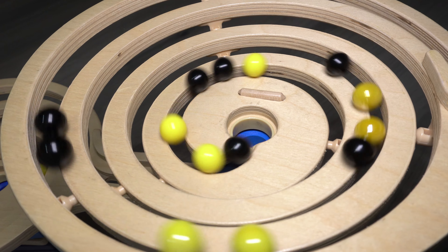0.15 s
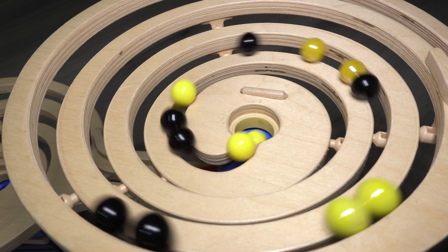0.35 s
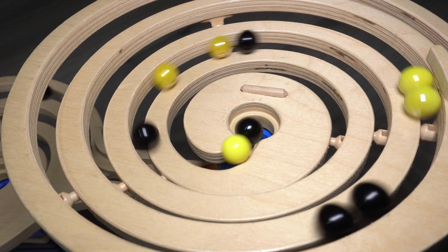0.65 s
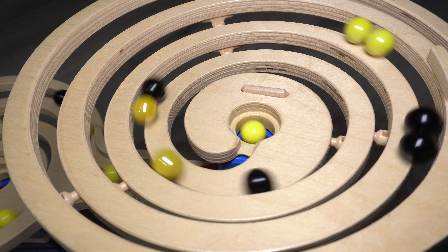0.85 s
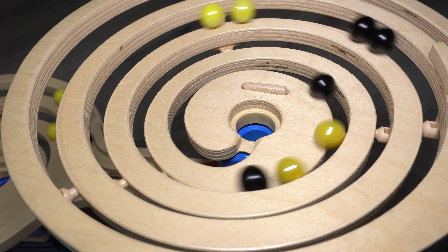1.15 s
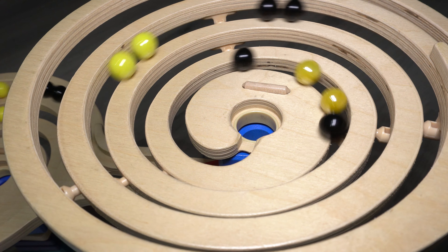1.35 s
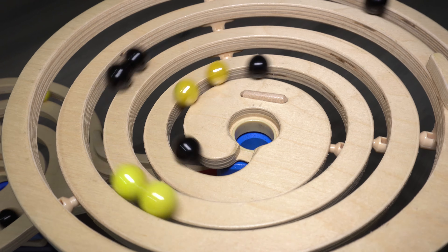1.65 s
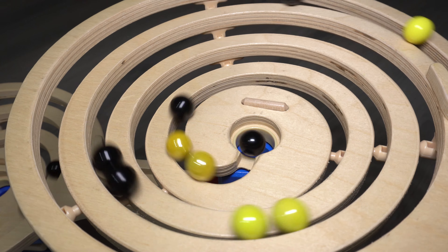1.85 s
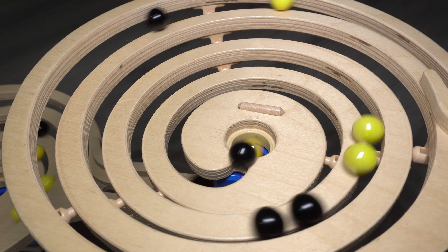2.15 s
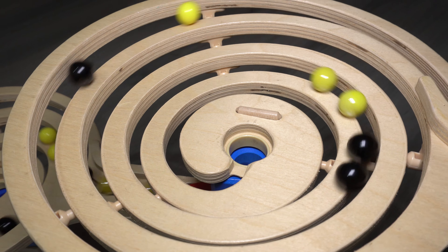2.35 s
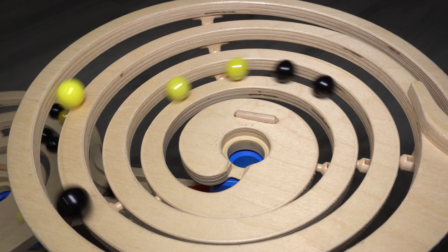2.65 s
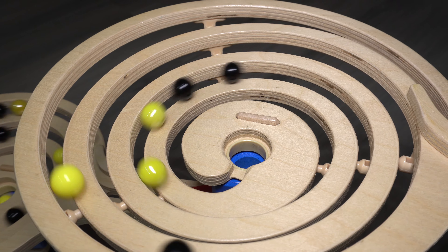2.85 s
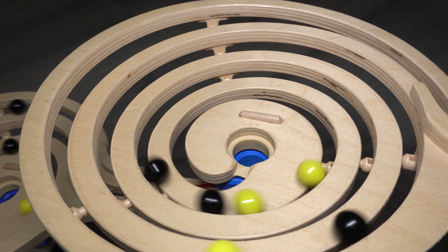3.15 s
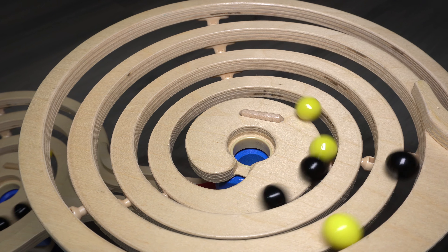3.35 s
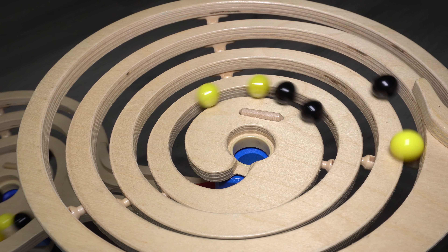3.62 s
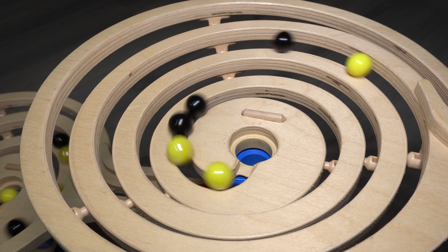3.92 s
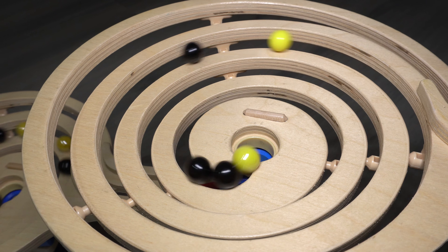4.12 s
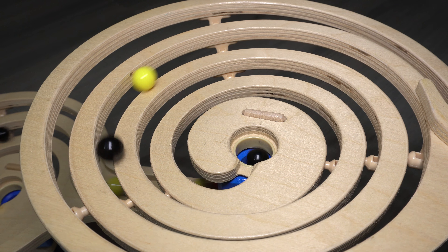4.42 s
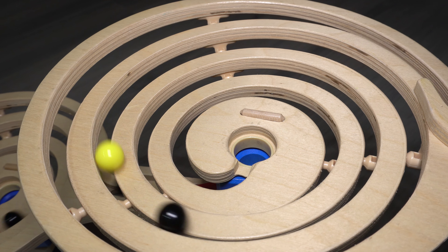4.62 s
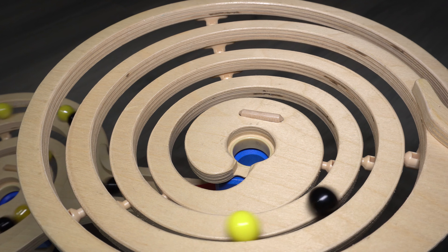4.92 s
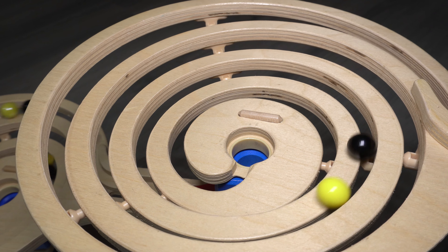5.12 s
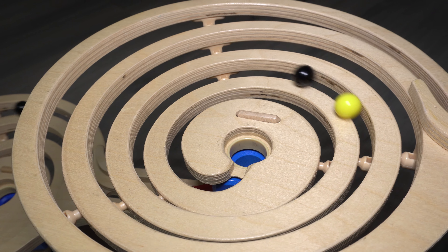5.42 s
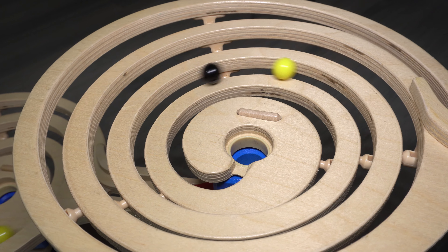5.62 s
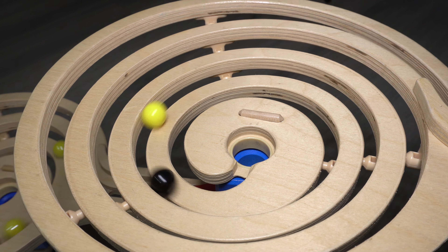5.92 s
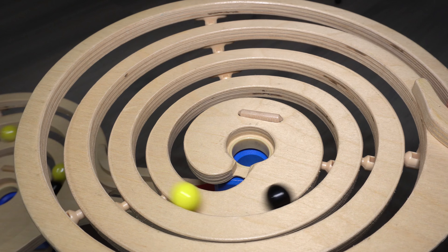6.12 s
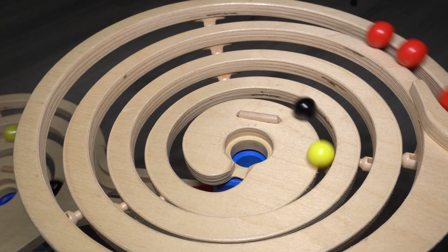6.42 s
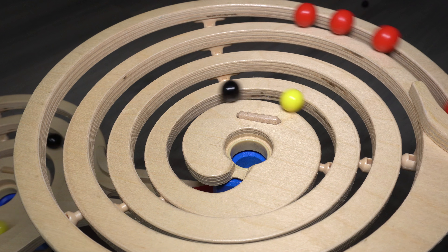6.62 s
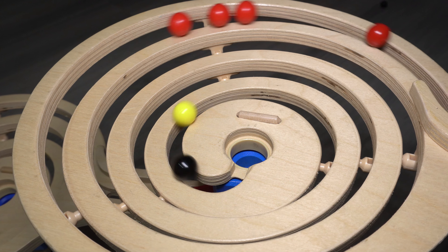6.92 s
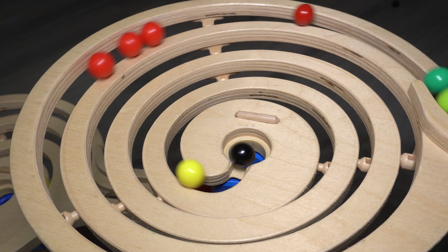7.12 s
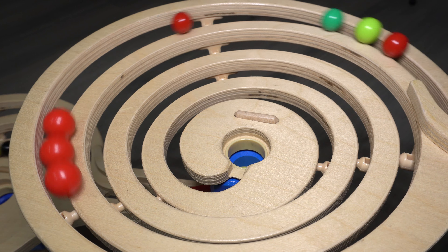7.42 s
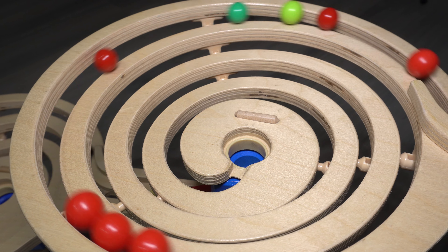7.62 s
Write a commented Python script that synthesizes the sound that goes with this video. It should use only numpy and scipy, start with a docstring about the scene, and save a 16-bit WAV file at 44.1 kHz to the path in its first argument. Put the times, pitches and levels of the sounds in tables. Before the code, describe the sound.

Close up, glass marbles drum and hiss down a plywood track in surges, with sharp clicks, pings and occasional knocks.

```python
"""In a small room, glass marbles run down a wooden spiral track on a table, close to the microphone.
Rolling is a stream of tiny bumps that drums on the plywood and hisses where glass meets wood; it thins
as the spiral empties and surges when a group picks up speed. Marbles rattle in bouts, tick against the
groove, ping and clack together, then knock, chink and thud further down. A low room rumble lies under it."""
import sys
import numpy as np
from scipy import signal
from scipy.fft import rfft, irfft
from scipy.io import wavfile
from scipy.ndimage import uniform_filter1d

SR = 44100
rng = np.random.default_rng(int(sys.argv[2]) if len(sys.argv) > 2 else 0)


def unload_audio(sound):
    """Save the sound as a 16-bit wav file, at the path given as the first command line argument."""
    columns = np.transpose(np.atleast_2d(sound))
    # keep every value between -1 and 1, then stretch to whole-number steps
    steps = np.round(np.clip(columns, -1, 1) * 32767)
    wavfile.write(sys.argv[1], SR, steps.astype(np.int16))


N = 342216

# tone of glass tapping wood: pitch_hz, level_db
GLASS_ON_WOOD = [(100, -26), (270, -21), (480, -6.5), (1500, -4.5), (2500, 3.5), (5200, 6.5), (8000, 3),
                 (9200, -9.5), (11000, -8.5), (16000, -22)]
# tone of a hit on the lower levels: pitch_hz, level_db
GLASS_BELOW = [(100, -54), (500, -5.5), (1800, -16), (3000, 2.5), (5000, 5.5), (8500, 3), (11000, -10.5),
               (16000, -29)]


def undb(db):
    """Turn decibels into a number to multiply by."""
    return 10 ** (np.asarray(db) / 20)


def unit(x):
    """Scale a sound to an average (rms) level of 1."""
    return x / np.sqrt(np.mean(x ** 2))


def curve(rows, column=1):
    """Join the points of a time table with straight lines."""
    rows = np.array(rows)
    return np.interp(np.arange(N) / SR, rows[:, 0], rows[:, column])


def at_hz(points, hz):
    """Read between (pitch_hz, value) points, with octaves evenly spaced."""
    pitches, values = np.transpose(points)
    return np.interp(np.log(hz + 1), np.log(pitches), values)


def fade(fade_s, size):
    """Die away by 60 dB in fade_s seconds."""
    return np.exp(-np.log(1000) * np.arange(size) / SR / max(fade_s, 1 / SR))


def swell(start_s, hold_s, rise_s, fall_db_per_s):
    """A volume that rises, holds and dies away."""
    t = np.arange(N) / SR - start_s
    return np.clip(t / rise_s, 0, 1) * undb(-fall_db_per_s * np.maximum(t - rise_s - hold_s, 0))


def add(out, start_s, sound):
    """Mix a sound in at start_s."""
    i = int(np.clip(start_s * SR, 0, N - 1))
    out[i:i + len(sound)] += sound[:N - i]


def resonate(x, hz, width_hz):
    """Keep a band around one pitch, so the sound rings there."""
    return signal.lfilter(*signal.iirpeak(hz, hz / width_hz, fs=SR), x)


def log_response(points, size):
    """Log of a filter with this (pitch_hz, level_db) tone that keeps hits sharp."""
    cepstrum = irfft(np.log(undb(at_hz(points, np.fft.rfftfreq(size, 1 / SR)))))
    cepstrum[1:size // 2] *= 2
    cepstrum[size // 2 + 1:] = 0  # nothing sounds before the hit
    return rfft(cepstrum)


def colour(x, points, size=4096):
    """Filter a sound to the given tone."""
    return signal.oaconvolve(x, irfft(np.exp(log_response(points, size))))[:len(x)]


def scatter(fade_s, count, size):
    """Filters made of dense, fading random echoes, one for each hit."""
    echoes = rng.standard_normal((count, size // 2)) * fade(fade_s, size // 2)
    return rfft(echoes / np.linalg.norm(echoes, axis=1, keepdims=True), size)


def wander(per_s):
    """A smooth random wobble, roughly 1 either way."""
    step = int(SR / per_s)
    return uniform_filter1d(np.repeat(rng.standard_normal(N // step + 1), step), step)[:N]


def impacts(per_s, spread_db):
    """Tiny bumps at random times, a few much stronger than the rest."""
    out, when = np.zeros(N), np.flatnonzero(rng.random(N) < per_s / SR)
    strength = undb(spread_db * np.minimum(rng.exponential(size=len(when)), 4))
    out[when] = strength * rng.choice([-1, 1], len(when))
    return unit(out)


def hits(rows, tone, notes, detune, groove_db, groove_fade_s, track_db, track_fade_s, ring_share):
    """Each hit clicks and rings briefly, echoes off the groove walls and spreads through the track."""
    size, ring_size = 8192, 2048
    starts, level_db, tilt_db_per_octave = np.transpose(rows)[:, :, None]
    # each hit has its own brightness: tilt the top five octaves
    tilt = np.exp(tilt_db_per_octave * log_response([(SR / 64, 0), (SR / 2, 5)], size))
    click = np.exp(log_response(tone, size))
    click /= np.abs(irfft(click)).max()
    t, ring = np.arange(ring_size) / SR, 0
    for hz, fade_s, db in notes:
        # every marble and every spot on the track rings a little differently
        pitch_hz = hz * (1 + detune * rng.standard_normal(starts.shape))
        ring += undb(db) * fade(fade_s, ring_size) * np.cos(2 * np.pi * pitch_hz * t)
    ring = rfft(ring, size)
    walls = 1 + undb(groove_db) * scatter(groove_fade_s, len(rows), size)
    direct = irfft(tilt * (click + ring) * walls)
    # the boards take up the blow itself, but only a share of the ring
    track = irfft(tilt * (click + ring_share * ring) * scatter(track_fade_s, len(rows), size))
    direct, track = (x / np.linalg.norm(x, axis=1, keepdims=True) for x in (direct, track))
    # a louder hit is nearer, so less of the track is heard with it
    drying_db_per_db, middling_db = 0.29, -31.5
    track_gain = undb(track_db - drying_db_per_db * (level_db - middling_db))
    hit_gain = np.sqrt(.003 * SR) * undb(level_db)  # as if the hit's energy filled 3 ms
    out = np.zeros(N)
    for start_s, sound in zip(starts[:, 0], hit_gain * (direct + track_gain * track)):
        add(out, start_s, sound)
    return out


def rolling_levels():
    """Drumming and hiss in dB: each surge adds its power to the steady rolling."""
    # rolling follows the number of marbles under way: time_s, drum_db, hiss_db
    steady = [(0, -46, -50.5), (0.85, -47, -45.5), (1.5, -45.5, -44.5), (1.85, -53.5, -51),
              (2.7, -40.5, -39.5), (3.2, -56.5, -57), (3.75, -52, -48), (3.95, -53.5, -57), (4.4, -46, -66),
              (4.8, -48, -52.5), (5.15, -52.5, -61.5), (5.45, -50, -47), (6.0, -50.5, -48.5),
              (6.45, -52, -48), (6.68, -54, -77), (6.92, -50.5, -42), (7.3, -56.5, -57), (7.76, -37.5, -47)]
    # a group speeds up and runs out: start_s, hold_s, drum_db, hiss_db, fall_db_per_s
    surges = [(1.953, 0.026, -33.5, -29, 130), (2.19, .07, -34.5, -28.5, 152),
              (2.478, 0.19, -37.5, -33, 34.5), (3.49, 0.037, -39, -40.5, 38),
              (5.262, 0.0083, -49, -35, 215), (7.457, 0.19, -38, -33, 55)]
    drum, hiss = undb(curve(steady, column=1)), undb(curve(steady, column=2))
    for start_s, hold_s, drum_db, hiss_db, fall in surges:
        speed = swell(start_s, hold_s, rise_s=0.03, fall_db_per_s=fall)
        drum = np.hypot(drum, undb(drum_db) * speed)
        hiss = np.hypot(hiss, undb(hiss_db) * speed ** 1.07)  # hiss dies faster than drumming
    return 20 * np.log10(drum), 20 * np.log10(hiss)


def rolling():
    """Marbles bump over the grain: the boards drum, the groove sounds hollow and the contact hisses."""
    # tone of the boards: pitch_hz, level_db
    board_tone = [(60, -33.5), (140, -14.5), (220, -21.5), (340, -8.5), (470, -7), (620, -1), (900, -1),
                  (1150, -1), (1500, -2), (2500, -6), (5000, -21.5), (16000, -62)]
    # tone of the hiss: pitch_hz, level_db
    hiss_tone = [(300, -21), (1000, -21), (2000, 1), (3200, 2), (5700, -0.5), (7000, -2), (8300, 0.5),
                 (9400, -8.5), (12000, -18.5), (16000, -28)]
    # where the plywood rings: pitch_hz, width_hz, level_db
    wood_notes = [(328, 34, -8.5), (543, 7.7, 0), (740, 55, -16), (916, 21, -28)]
    # where the hollow groove rings: pitch_hz, width_hz, level_db
    groove_notes = [(817, 150, 4.5), (981, 45, 7.5), (1425, 280, 1.5), (3080, 2100, -23)]
    drum_db, hiss_db = rolling_levels()
    bumps = impacts(per_s=2500, spread_db=3) * undb(2.3 * wander(per_s=45))
    wood_ring = sum(undb(db) * resonate(bumps, hz, width) for hz, width, db in wood_notes)
    boards = colour(bumps + wood_ring, board_tone)
    grit = impacts(per_s=8000, spread_db=3.5) * undb(1.6 * wander(per_s=70))
    groove = sum(undb(db) * resonate(resonate(grit, hz, width), hz, width)
                 for hz, width, db in groove_notes)
    # the harder the marbles run, the more of their drumming goes into the groove
    full_roll_db = -33
    hollow = np.clip(0.69 * undb(drum_db - full_roll_db), 0, .7)
    drum = np.sqrt(1 - hollow) * unit(boards) + np.sqrt(hollow) * unit(groove)
    return drum * undb(drum_db) + unit(colour(grit, hiss_tone)) * undb(hiss_db)


def rumble():
    """The room's low background noise eases a little, then holds."""
    # loudness of the rumble: time_s, level_db
    levels = [(0, -44.5), (3.0, -49.5), (7.76, -49.5)]
    # its tone: pitch_hz, level_db
    tone = [(15, 4), (30, -1), (62, -5), (80, -19.5), (105, -32), (150, -17), (220, -42), (450, -14.5),
            (1500, -34.5), (8000, -54), (16000, -64)]
    return undb(curve(levels)) * unit(colour(rng.standard_normal(N), tone))


def rattling():
    """Jostling marbles make small taps, blurred by the groove walls, and high pings."""
    # marbles bunch up: start_s, hold_s, level_db
    bouts = [(0.025, 0.19, -46.5), (0.598, 0.45, -42), (2.013, 0.57, -39.5), (3.56, 0.21, -46),
             (4.16, 0.36, -43), (5.19, 0.79, -43), (6.152, 0.24, -48), (6.844, 0.19, -45),
             (7.522, .26, -36)]
    walls = irfft(scatter(fade_s=0.0078, count=1, size=2048))[0]
    blurred = signal.oaconvolve(impacts(per_s=100, spread_db=5.0), walls)[:N]
    taps = unit(colour(blurred, GLASS_ON_WOOD))
    jostle = impacts(per_s=45, spread_db=4)
    glass_ring = unit(resonate(jostle, hz=7170, width_hz=240)
                      + undb(-14.5) * resonate(jostle, hz=9950, width_hz=200)
                      + undb(-15) * resonate(jostle, hz=12150, width_hz=200))
    volume = sum(undb(db) * swell(start_s, hold_s, rise_s=0.042, fall_db_per_s=104)
                 for start_s, hold_s, db in bouts)
    return (taps + undb(-5.5) * glass_ring) * volume


def ticks():
    """Marbles tap the wooden wall of the groove."""
    # each tap: start_s, level_db, tilt_db_per_octave
    taps = [(0.0293, -25, .5), (0.0775, -24.5, -4.5), (0.1452, -28.5, 0), (0.1741, -26, 0),
            (0.2256, -32.5, 1.5), (0.2885, -32.5, -1), (0.4757, -19, 2), (0.5616, -26, 1), (0.6576, -31, 1),
            (0.684, -23, -3.5), (0.7304, -28.5, -2), (0.7669, -25.5, 1), (0.79, -26.5, -3),
            (0.8662, -21.5, -.5), (0.8808, -29.5, -3), (0.9322, -25.5, -0.5), (1.1173, -30, -2),
            (1.3759, -29, -2), (1.4983, -28, 5), (1.5889, -28.5, -1), (1.6278, -28, 2), (2.0349, -29, 1),
            (2.1388, -27, -4), (2.2076, -21.5, -2), (2.2991, -20.5, 12), (2.3521, -26.5, 4),
            (3.2144, -39, 8), (3.2932, -36, -4), (3.3859, -42.5, 16), (3.4336, -32, 0),
            (3.5195, -22.5, -2.5), (3.5589, -24.5, 5), (3.6388, -28, 1), (3.7368, -31.5, -3.5),
            (3.8226, -34, -2), (3.851, -28, 1.5), (3.9827, -32, -2.5), (4.003, -27.5, 2), (4.0449, -35, 1),
            (4.1005, -23.5, 2.5), (4.1239, -33.5, -4), (4.1563, -30, -6.5), (4.271, -24.5, -4),
            (4.2911, -25, 3), (4.3126, -36, -4), (4.3352, -26.5, -6), (4.3478, -19, -1), (4.3515, -23, -1),
            (4.4299, -20, -1.5), (4.4566, -36, 3), (4.4707, -31.5, 4), (5.075, -39, -7),
            (5.2298, -24.5, 3.5), (5.2585, -22, 5), (5.3889, -49, 6), (5.4701, -18, 5),
            (5.5996, -24.5, -2.5), (5.8831, -27.5, -3), (6.0002, -35, 11), (6.2053, -29.5, -1.5),
            (6.6113, -40, -4.5), (7.0627, -32, -5.5), (7.1078, -24, -.5), (7.3778, -22, 2.5),
            (7.7148, -33, -2)]
    # its ring: pitch_hz, fade_s, level_db
    notes = [(2360, 0.015, -22), (4200, 0.018, -20.5), (5070, 0.039, -21), (8050, 0.006, -10)]
    return hits(taps, GLASS_ON_WOOD, notes, detune=0.13, groove_db=1.0, groove_fade_s=0.0052,
                track_db=-4.0, track_fade_s=0.15, ring_share=0.31)


def pings():
    """Rattling marbles ring short and bright, at nearly the same pitch each time."""
    # each ping: start_s, level_db, tilt_db_per_octave
    taps = [(0.0921, -22.5, -1), (0.3287, -30, -6.5), (0.3431, -21.5, -2), (0.3553, -23.5, -7),
            (0.38, -22.5, -3), (0.4007, -23, -3.5), (0.8003, -25.5, -4.5), (0.8212, -21, -1.5),
            (0.968, -23, -3), (0.9831, -27, -3), (1.0013, -26, -4.5), (2.1533, -31, -3), (2.2404, -19, 11),
            (2.9087, -30.5, -0.5), (3.7564, -45, -3), (3.7778, -29.5, -1.5), (3.9295, -37, -4.5),
            (4.1676, -28, -2), (4.1849, -23.5, -4), (4.3884, -28.5, -3), (4.5874, -33, 2),
            (4.6015, -27.5, -1), (4.6841, -38, -2), (4.7115, -36.5, 1), (5.5699, -24, 5),
            (5.6276, -28, -4.5), (5.9024, -25, 3), (7.2602, -20.5, -2), (7.4413, -23, -2.5)]
    # its ring: pitch_hz, fade_s, level_db
    notes = [(2400, 0.019, -19.5), (7080, 0.012, -8.5), (6780, 0.028, -8), (10100, 0.014, -30),
             (12400, .015, -48)]
    return hits(taps, GLASS_ON_WOOD, notes, detune=0.0022, groove_db=-1.0, groove_fade_s=0.004,
                track_db=-6, track_fade_s=0.092, ring_share=0.37)


def clacks():
    """Marbles run into each other on the top spiral."""
    # each collision: start_s, level_db, tilt_db_per_octave
    collisions = [(0.4916, -13.5, 0), (1.2434, -14, -.3), (1.4289, -14.5, 0), (1.7015, -14, 0),
                  (1.735, -19.5, 0), (1.8859, -17, 0.5), (2.1764, -17, .7), (2.2753, -19, 1.5),
                  (2.4044, -16, 0.3), (2.5106, -18, -0.5), (2.9976, -27, 0.3), (4.7883, -16.5, 1.5),
                  (5.2778, -24, -2.5), (5.3981, -15, .2), (5.4628, -16, -1), (5.5342, -17, 1),
                  (5.6694, -16, 1.5), (5.7793, -15.5, 0.7), (5.918, -16.5, 0.5), (6.2336, -27, 1.5),
                  (6.3513, -32.5, 2), (7.0837, -15, 0.5), (7.2187, -16.5, -0.7), (7.3561, -15.5, .5),
                  (7.64, -16, 1)]
    # tone of glass hitting glass: pitch_hz, level_db
    tone = [(100, -23), (300, -39.5), (550, -5.5), (1200, -16.5), (1800, -2), (4500, -0.5), (6200, -4),
            (8300, 1), (9600, -8), (12500, -6.5), (16000, -8.5)]
    # its ring: pitch_hz, fade_s, level_db
    notes = [(1883, 0.0082, -16), (2450, 0.012, -22), (3550, 0.008, -28), (3946, 0.0061, -13.5),
             (7380, 0.0065, -21.5), (7830, 0.014, -23)]
    return hits(collisions, tone, notes, detune=0.025, groove_db=-0.5, groove_fade_s=0.0034,
                track_db=2.5, track_fade_s=0.13, ring_share=0.084)


def knocks():
    """Marbles strike small hollow parts."""
    # each blow: start_s, level_db, tilt_db_per_octave
    blows = [(0.5453, -16, -.5), (0.5856, -18, 3), (2.6364, -23.5, 17), (5.8615, -21.5, 3),
             (6.6302, -31.5, -1.5), (6.6941, -34, -4), (6.7095, -29, -2), (6.856, -25.5, 0.5),
             (7.7024, -21.5, 8)]
    # its ring: pitch_hz, fade_s, level_db
    notes = [(2620, .03, -39), (2820, 0.068, -21.5), (3120, 0.018, -21), (3820, 0.014, -15),
             (8300, .02, -50)]
    return hits(blows, GLASS_BELOW, notes, detune=0.0044, groove_db=9.0, groove_fade_s=0.011,
                track_db=-7, track_fade_s=0.16, ring_share=0.61)


def long_rings(size=16384):
    """Now and then a blow leaves a hard part ringing faintly."""
    # each lingering note: start_s, pitch_hz, level_db, fade_s
    notes = [(0.546, 2990, -34, 0.16), (3.735, 5360, -44, .35), (6.35, 3070, -46, 0.37),
             (6.351, 4010, -41.5, 0.32), (6.35, 5320, -43, .35), (6.709, 3000, -40, 0.14),
             (6.856, 2930, -37, 0.28)]
    out, t = np.zeros(N), np.arange(size) / SR
    for start_s, hz, db, fade_s in notes:
        add(out, start_s, undb(db) * fade(fade_s, size) * np.sin(2 * np.pi * hz * t))
    return out


def chinks():
    """Marbles land among others further down."""
    # each landing: start_s, level_db, tilt_db_per_octave
    landings = [(1.1578, -29.5, -4), (1.1709, -28.5, -0.5), (1.1961, -25.5, -5.5), (1.5449, -27, 3),
                (4.5385, -28.5, -3), (5.1927, -31, -2.5), (5.9353, -24.5, -0.5), (5.9746, -30.5, 4),
                (6.0476, -30.5, -1.5), (6.0855, -32, 0), (6.1065, -31, -2.5), (6.259, -26, -1.5),
                (6.3104, -28, 5), (6.4353, -28, 5.5), (6.4439, -36, 3), (6.4817, -31.5, 1.5),
                (6.8008, -23.5, 6), (6.8669, -22.5, 1.5), (6.919, -28.5, -1), (6.9631, -28.5, 3),
                (7.0079, -32, -4.5), (7.3048, -32, 1)]
    # its ring: pitch_hz, fade_s, level_db
    notes = [(2860, 0.02, -17.5), (4200, 0.029, -12), (4520, 0.023, -7.5), (5440, 0.029, -15),
             (5640, 0.033, -6), (8480, 0.028, -10.5), (8300, 0.023, -37), (10200, .03, -49)]
    return hits(landings, GLASS_BELOW, notes, detune=0.02, groove_db=11, groove_fade_s=0.012,
                track_db=-0.5, track_fade_s=0.07, ring_share=0.51)


def thuds(size=16384):
    """A dropping marble or a bump of the frame shakes many low notes out of the boards."""
    # each thud: start_s, level_db, pitch_hz, width_hz, fade_s
    blows = [(1.324, -21.5, 815, 300, 0.074), (1.322, -43, 328, 210, 0.23), (1.96, -32.5, 140, 150, 0.085),
             (1.962, -29.5, 900, 820, 0.27), (1.986, -28, 1200, 1720, 0.2), (2.135, -36, 50, 23, 0.36),
             (2.212, -30, 920, 350, 0.09), (3.433, -38.5, 780, 520, 0.15), (4.328, -39.5, 50, 36.6, 0.18),
             (5.161, -36.5, 66, 28, 0.19), (5.227, -35, 650, 600, 0.11), (5.276, -27, 805, 603, 0.072),
             (6.954, -31.5, 700, 506, 0.059)]
    out = np.zeros(N)
    for start_s, db, hz, width, fade_s in blows:
        shake = resonate(resonate(rng.standard_normal(size), hz, width), hz, width)
        add(out, start_s, undb(db) * unit(shake) * fade(fade_s, size))
    return out


def room(x, echo_db, build_s, size=22050):
    """Add the blurred echo of a small room; the highs die first."""
    # how long the room rings: pitch_hz, fade_s
    decay = [(200, 0.89), (2000, 0.35), (7000, 0.28), (14000, 0.18)]
    pitches, fades = np.transpose(decay)
    noise, hz = rfft(rng.standard_normal(size)), np.fft.rfftfreq(size, 1 / SR)
    bands = [irfft(noise * at_hz(np.c_[pitches, share], hz)) for share in np.eye(len(pitches))]
    tail = sum(band * fade(fade_s, size) for band, fade_s in zip(bands, fades))
    tail *= np.clip(np.arange(size) / SR / build_s, 0, 1)
    return x + undb(echo_db) * signal.fftconvolve(x, tail / np.linalg.norm(tail))[:N]


def scene():
    """Balance all the marbles and set them in the room, over its rumble."""
    top = undb(1.5) * clacks()
    rest = (undb(-0.2) * ticks() + undb(-0.8) * pings() + undb(1.5) * chinks() + undb(-2.0) * knocks()
            + long_rings() + rattling() + thuds() + rolling())
    mix = rumble() + room(top, echo_db=-13.0, build_s=0.032) + room(rest, echo_db=-13.5, build_s=0.014)
    return mix[None]


def record(dry):
    """The microphone rounds the sharpest peaks and steeply cuts the highest sounds."""
    ceiling, top_hz = 0.67, 15800
    rounded = ceiling * np.tanh(dry / ceiling)
    return signal.sosfilt(signal.ellip(10, .2, 70, top_hz, fs=SR, output="sos"), rounded)


dry = scene()
out = record(dry)
unload_audio(out)
```